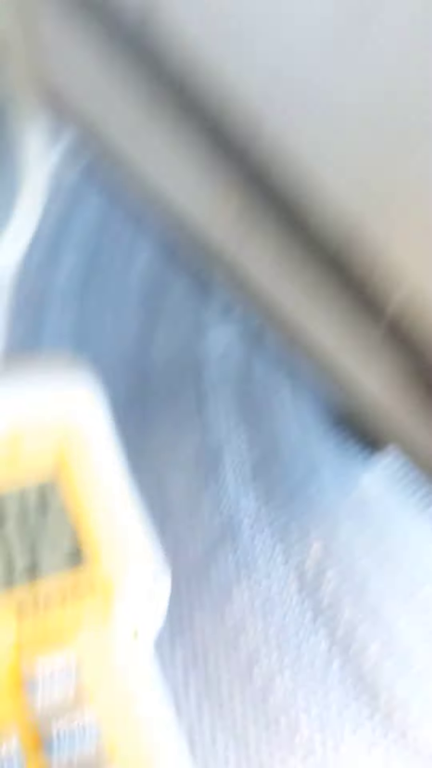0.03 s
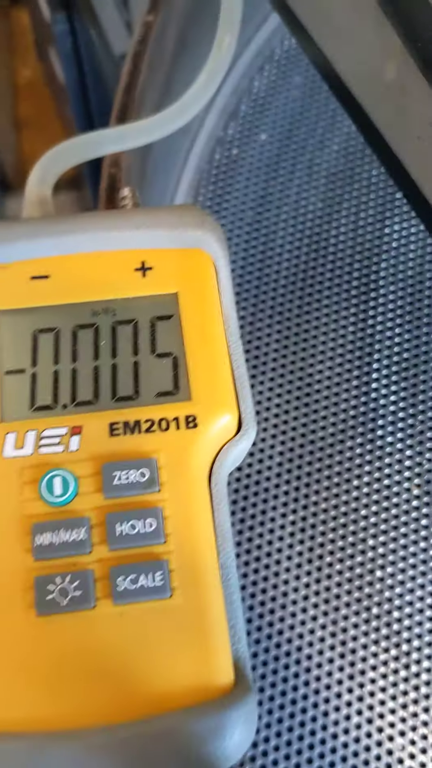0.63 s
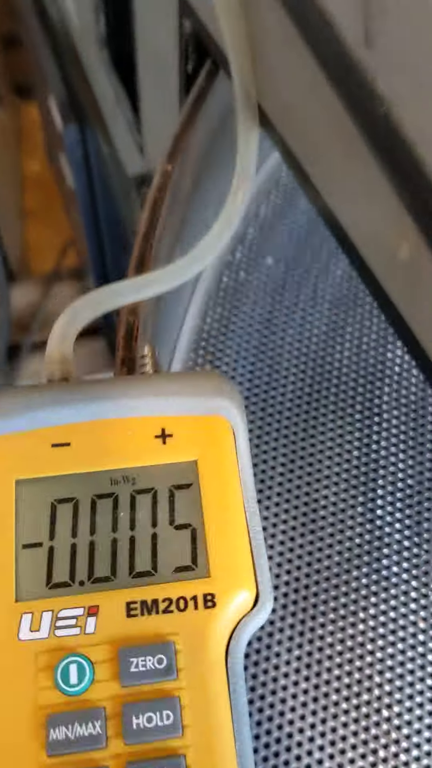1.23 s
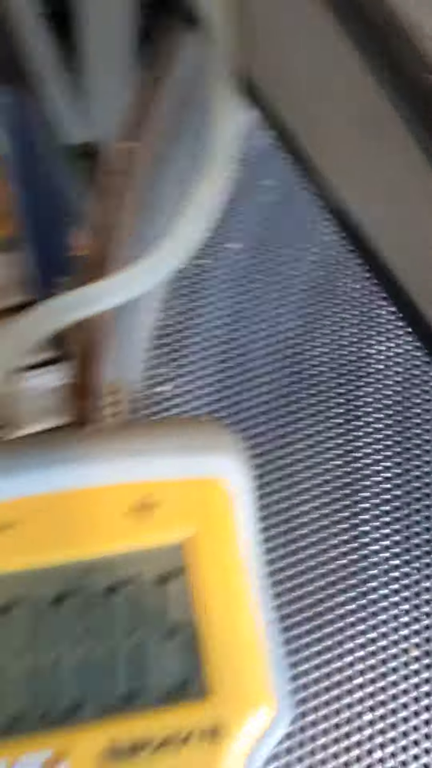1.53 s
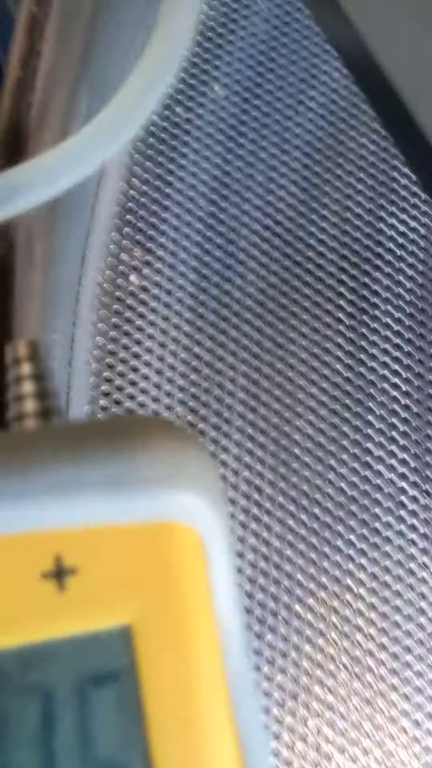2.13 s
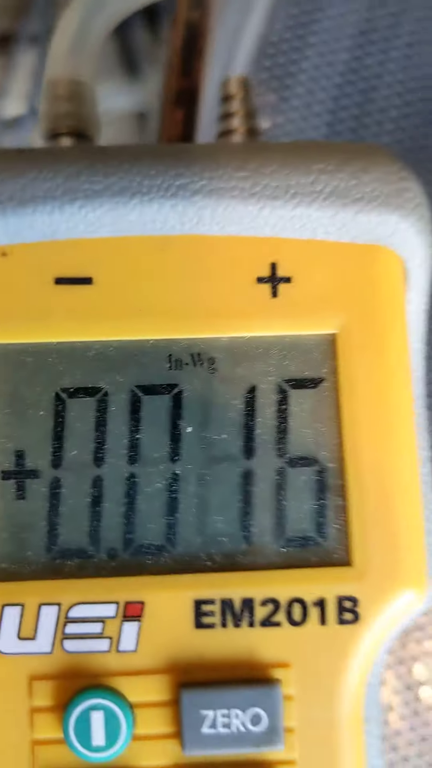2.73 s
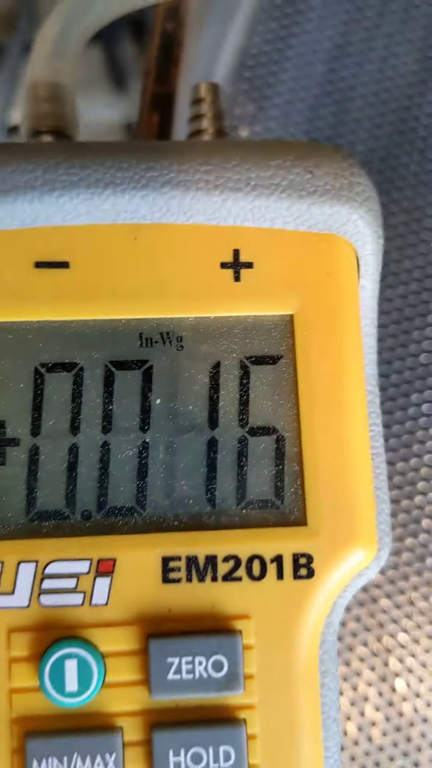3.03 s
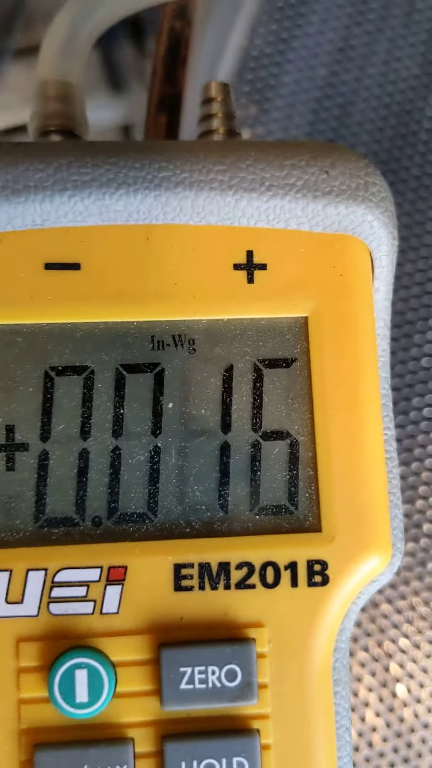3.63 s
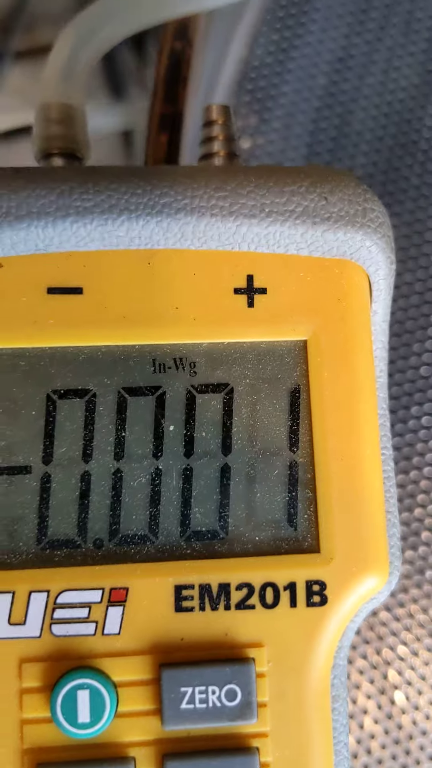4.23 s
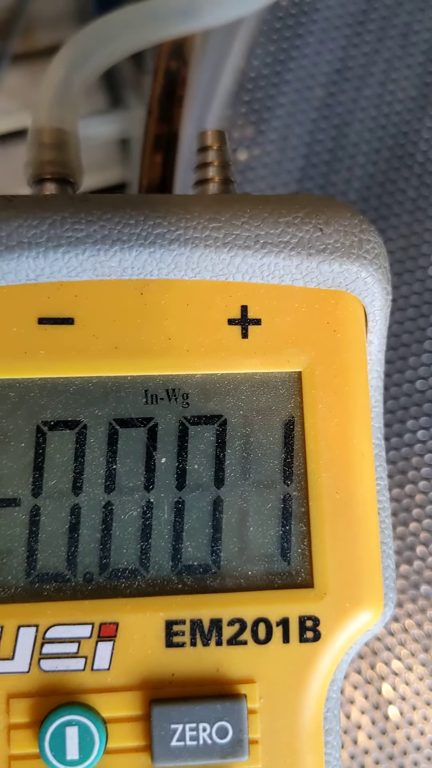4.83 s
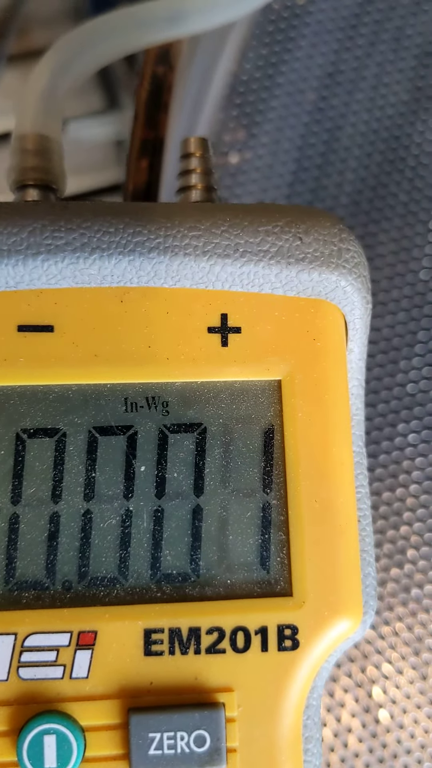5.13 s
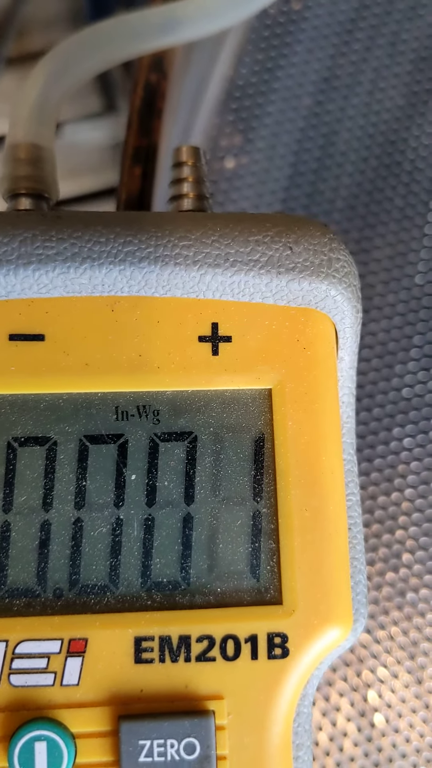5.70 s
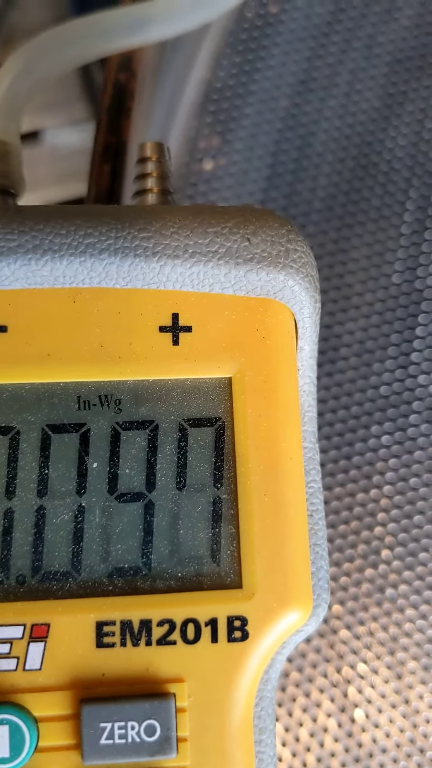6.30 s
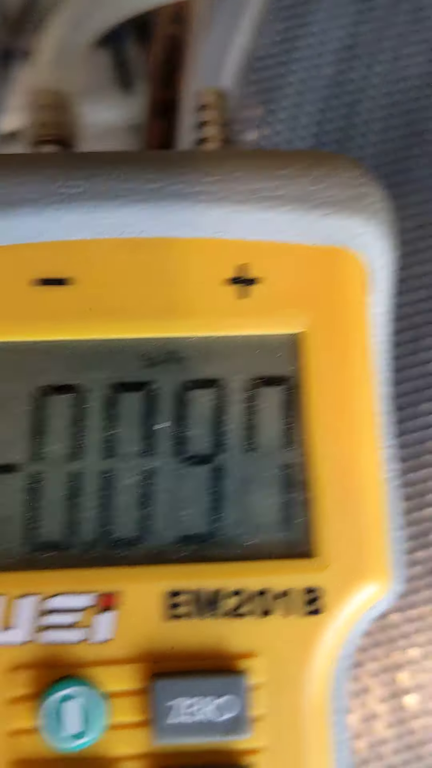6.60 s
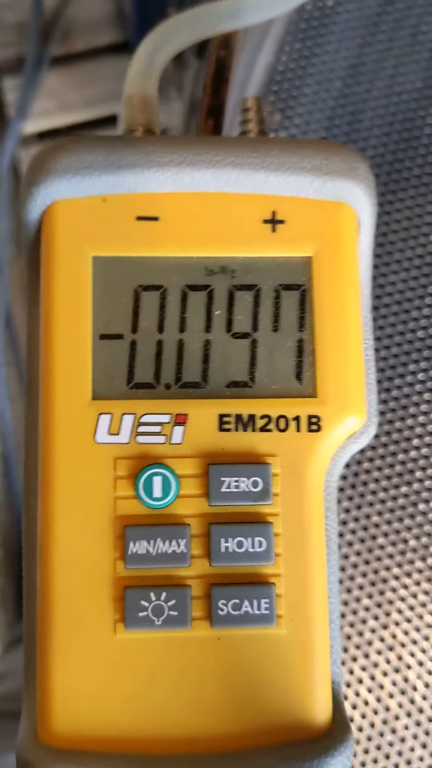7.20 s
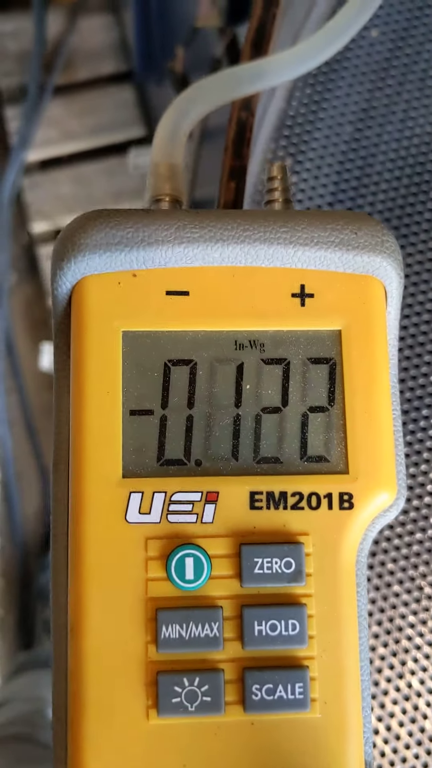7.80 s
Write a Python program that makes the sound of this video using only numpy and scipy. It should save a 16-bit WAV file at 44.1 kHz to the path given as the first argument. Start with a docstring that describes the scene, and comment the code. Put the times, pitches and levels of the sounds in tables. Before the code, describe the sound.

Close beside a running roasting machine indoors, a motor and fan hum steadily over a low rumble of air in the ducts. Air hisses softly through a perforated steel tray while sheet metal rattles and ticks faintly. A brief dry tap touches the right microphone at the start, a hand rustles softly, and near the end a plastic meter clicks once.

```python
"""Indoors, close beside a running coffee roaster, on a hand-held stereo recorder.
The motor and fan hum over a rumble of air in the ducts. Air hisses through a perforated steel tray,
slots and panels sing up now and then, and the sheet metal rattles and ticks faintly.
The balance shifts as the microphones move over the machine. Nearest of all is the hand: it touches
the recorder once, rustles softly, and near the end a plastic meter held in it clicks."""
import sys
import numpy as np
from scipy import signal
from scipy.fft import rfft, irfft
from scipy.io import wavfile
from scipy.ndimage import uniform_filter1d, minimum_filter1d

SR = 44100
rng = np.random.default_rng(int(sys.argv[2]) if len(sys.argv) > 2 else 0)


def log_audio(samples):
    """Write samples as a 16-bit WAV file to the path given in sys.argv[1]."""
    # one column per channel
    frames = np.atleast_2d(samples).T
    # limit to full scale, then quantise
    limited = np.clip(frames, -1, 1)
    pcm = np.round(limited * 32767).astype(np.int16)
    wavfile.write(sys.argv[1], SR, pcm)


N = 350595
T, HZ = np.arange(N) / SR, np.fft.rfftfreq(N, 1 / SR)

# How open the fan outlet lies to the moving microphones. Each row: time in seconds, exposure in dB.
OUTLET_EXPOSURE = [(0, -3.5), (1.25, -4), (1.65, -1), (2.1, 1.5), (2.7, -0.5), (4.6, 1), (6.2, 0), (6.8, 1),
                   (7.95, -0.5)]
# How alike the air sounds at the two microphones. Each row: frequency in Hz, correlation from -1 to 1.
MIC_LIKENESS = [(30, .98), (60, 0.94), (200, 0.99), (280, 1), (340, 0.92), (400, 0.84), (460, 0.77),
                (560, 0.59), (720, 0.26), (900, 0.057), (1250, -0.23), (1900, -0.048), (2600, -0.0014),
                (15000, -0.042)]

# Colours of the noises. Each row: frequency in Hz, relative level in dB.
RUMBLE_COLOUR = [(15, -40), (32, -28), (42, -16.5), (55, -5.5), (100, -5), (135, 0), (200, 0), (300, -2.5),
                 (345, -6), (400, -10.5), (600, -14), (900, -20.5), (1400, -32), (2500, -64)]  # air in the ducts
RUSH_COLOUR = [(400, -14), (900, 4.5), (1400, 1.5), (1900, -1), (2450, -2.5), (3000, -7), (4000, -17),
               (7000, -21.5), (15800, -36)]  # soft rush from the machine
HISS_COLOUR = [(1500, -25), (2800, 1.5), (4000, 1.5), (5000, -1), (6200, -1.1), (6900, -0.5), (7500, -5),
               (9300, -6.5), (10500, -15.5), (15800, -14)]  # air through the tray
SIZZLE_COLOUR = [(3000, -30), (6500, -5), (9000, -2.5), (10300, -2), (12500, -2.5), (15800, -10.5)]  # thin top of the hiss
RATTLE_COLOUR = [(1200, -30), (2500, 3), (5000, 4.5), (7000, -7), (9000, -7), (15000, -20)]  # loose contacts
PING_COLOUR = [(1200, -22), (2200, 0), (5000, -1), (7000, -3), (9000, -11), (15000, -20)]  # ticking sheet metal
RUSTLE_COLOUR = [(700, -20), (1300, 0), (2200, 1), (3200, -7), (8000, -26), (15000, -26)]  # the hand

# Resonances of the ducts and housing. Each row: centre in Hz, width in Hz, boost in dB.
DUCT_RESONANCES = [(45, 4, 6), (271, 18, 10), (288, 17, 11), (455, 24, 8)]
# The hiss as the microphones pass over the tray. Each row: time in seconds, level in dB.
HISS_PASS = [(0, -44), (.75, -45), (1.35, -42), (1.65, -49), (2.9, -41), (4, -44), (5, -43), (6.55, -44.5),
             (7, -42.5), (7.95, -43.5)]
# Gusts through the tray that lift the sizzle. Each row: centre and length in seconds, rise in dB.
TRAY_GUSTS = [(1.18, .6, 5), (2.8, 1.3, 1), (6.85, .65, 6)]
# Singing slots and panels. Each row: start and end in seconds, pitch and width in Hz, level in dB.
SINGING_SLOTS = [(.55, .9, 545, 12, -35), (1.85, 2.17, 542, 10, -30.5), (5.5, 5.8, 450, 16, -31),
                 (2.2, 2.62, 2530, 80, -46), (3.55, 3.95, 2520, 90, -47), (6.12, 6.42, 2520, 80, -47.5),
                 (2.2, 6.8, 6750, 500, -56), (5.9, 8.1, 9100, 1400, -55.5), (-.2, 6.6, 11830, 160, -66)]
# Swells of fine rattle in the machine. Each row: centre and length in seconds, level in dB.
RATTLE_SWELLS = [(1.29, .04, -46), (2.39, .06, -45), (2.96, .05, -47), (3.15, .08, -43), (3.72, .07, -47),
                 (4.71, .08, -43), (4.97, .05, -47), (5.15, .07, -42.5), (5.58, .06, -43.5),
                 (6.0, .07, -45), (7.82, .07, -44)]
# The clear ticks of the sheet metal. Each row: start in seconds, peak in dB before colouring.
METAL_PINGS = [(.1312, -34), (1.4945, -21), (1.898, -24), (2.065, -19), (3.1402, -23), (5.4585, -24),
               (5.558, -24), (5.9902, -29)]

# Shifts of the hand's grip. Each row: centre and length in seconds, level in dB.
GRIP_SHIFTS = [(.92, 0.24, -38.5), (1.25, .25, -42), (2.42, .14, -43.5), (4.74, .12, -43)]
# One touch by the right microphone: start in seconds, peak on the right in dB, left over right in dB.
MIC_TOUCH = (.2188, -5, -26)
# Slips of the meter's case, heard as one click.
# Each row: start in seconds, peak in dB before panning, left over right in dB.
CASE_SLIPS = [(7.0732, -9, 1), (7.075, -13, -5), (7.0774, -9.5, 2), (7.0798, -12, 1), (7.0815, -8.5, 5),
              (7.0875, -18, 0)]
# Ringing modes. Each row: frequency in Hz, relative level in dB, seconds to fall by 60 dB.
TOUCH_MODES = [(2260, -4, 0.0029), (10700, 2, 0.00096)]  # the touched recorder
CASE_MODES = [(1860, 2, 0.012), (1950, -7, .02), (2420, 2.5, 0.014), (2750, -7, 0.0039), (3170, 1, 0.0043),
              (4200, -8, 0.009), (6600, -6, 0.006), (7500, -2.5, 0.0063), (8500, -7, .005)]  # the meter's plastic case

# Weak steady tones of the drive and panels. Each row: frequency in Hz, rms level in dB.
PANEL_TONES = [(259.05, -33), (330.17, -35), (349.12, -43), (522, -46), (539.5, -42), (569.35, -46)]
# The microphones cross the whine's standing wave. Each row: centre and length in seconds, rise in dB.
WHINE_CROSSINGS = [(1.7, 0.21, 3.5), (6.76, 0.24, 6.5)]
# Tones of the fan. Each row: multiple of the shaft speed, base level in dB, left over right in dB,
# lead of the left microphone in radians, share of the outlet's exposure from 0 to 1.
FAN_ORDERS = [(2, -31, -2, 0, 0.3), (3, -34.5, -1, 0.25, 0.2), (4, -37, -2, 0, 0.1),
              (5, -29.5, 0, -0.2, 0.4), (6, -29, -4, -0.8, 0), (8, -14.5, 1.5, 0.12, 0.07),
              (16, -26.5, -2, 0.49, 1), (28, -49, 16.5, 1.5, 1), (32, -58, 9, -3, 0.4),
              (38, -69, -9, -3, .3), (40, -49, 8, 4, .3)]


def amp(db):
    """Decibels to gain."""
    return 10 ** (np.asarray(db) / 20)


def unit(x):
    """Scales to rms 1."""
    return x / np.sqrt(np.mean(x ** 2) + 1e-20)


def across(points):
    """Reads a table over log frequency."""
    hz, value = np.transpose(points)
    return np.interp(np.log(HZ + 1), np.log(hz + 1), value)


def along(points):
    """Reads a table over time."""
    return np.interp(T, *np.transpose(points))


def sides(pan_db):
    """Gains at the two microphones, the left louder by pan_db."""
    return amp(np.array([[pan_db], [-pan_db]]) / 2)


def bell(centre, length):
    """A smooth rise and fall around a time."""
    return np.exp(-(2 * (T - centre) / length) ** 2)


def swells(rows):
    """Smooth rises in dB, one for each row."""
    return sum(db * bell(centre, length) for centre, length, db in rows)


def wander(rate):
    """A random drift of rms 1, up to about this many changes a second."""
    return unit(irfft(rfft(rng.standard_normal(N)) * np.exp(-(HZ / rate) ** 2) * (HZ > 0), N))


def noise(shape_db):
    """Coloured noise at the two microphones: alike in the bass, diffuse in the treble."""
    left, other = rfft(rng.standard_normal((2, N)))
    likeness = np.clip(across(MIC_LIKENESS), -1, 1)
    right = likeness * left + np.sqrt(1 - likeness ** 2) * other
    return unit(irfft(np.array([left, right]) * amp(shape_db), N))


def add(mix, start, sound):
    """Adds a stereo sound at a time in seconds."""
    part = mix[:, round(start * SR):][:, :sound.shape[1]]
    part += sound[:, :part.shape[1]]


def duct_rumble(level_db=-14.0, shadow_share=0.58, shadow_hz=370):
    """Turbulence rings the ducts; its upper part passes in and out of shadow as the microphones move."""
    resonance_db = sum(db * np.exp(-2 * ((HZ - hz) / width) ** 2) for hz, width, db in DUCT_RESONANCES)
    air = noise(across(RUMBLE_COLOUR) + resonance_db)
    upper = irfft(rfft(air) * (1 + np.tanh((HZ - shadow_hz) / 40)) / 2, N)
    upper_gain = amp(shadow_share * along(OUTLET_EXPOSURE))
    return amp(level_db) * (air + upper * (upper_gain - 1))


def eddies(air, depth_db, rate):
    """Uneven flow: overlapping bands swell and fade each on their own."""
    spectrum, centres_hz = rfft(air), np.geomspace(900, 15000, 9)
    bands = (irfft(spectrum * np.interp(HZ, centres_hz, pick), N) for pick in np.eye(len(centres_hz)))
    return unit(sum(band * amp(depth_db * wander(rate)) for band in bands))


def panel_echoes(direct, strength=0.074, drift_s=.00004, count=8):
    """Nearby steel panels return short echoes, which comb the sound and shift as the hand drifts."""
    out = direct.copy()
    for mic, sound in zip(out, direct):
        drift = drift_s * wander(1)
        for delay_s, slope in rng.uniform([.001, -1], [.012, 1], (count, 2)):
            echo = np.interp(T - slope * drift, T, sound)
            mic += strength * np.roll(echo, round(delay_s * SR))
    return out


def tray_air(rush_db=-35.0, rush_share=0.31, sizzle_db=-51.5, eddy_db=0.57, flicker_db=0.95):
    """Air rushes from the fan outlet and hisses through the tray's small holes; gusts add sizzle."""
    rush_gain = amp(rush_db + rush_share * along(OUTLET_EXPOSURE)) * sides(0.95)
    rush = rush_gain * eddies(noise(across(RUSH_COLOUR)), eddy_db, rate=25)
    hiss = amp(along(HISS_PASS)) * sides(1.0) * eddies(noise(across(HISS_COLOUR)), eddy_db, rate=10)
    sizzle = amp(sizzle_db + swells(TRAY_GUSTS) + eddy_db * wander(12)) * noise(across(SIZZLE_COLOUR))
    return panel_echoes(rush + hiss + sizzle) * amp(flicker_db * wander(34))


def singing_slots(waver_db=3.5):
    """The air stream excites narrow resonances of slots and panels, which come and go."""
    out = np.zeros((2, N))
    for start, end, hz, width, db in SINGING_SLOTS:
        fade_s = .15 * (end - start) + .07
        gate = np.clip(np.minimum(T - start, end - T) / fade_s, 0, 1)
        resonance_db = -20 * np.log10(1 + (2 * (HZ - hz) / width) ** 2)
        out += amp(db + waver_db * wander(5.4)) * gate * noise(resonance_db)
    return out


def loose_rattle(per_s=900, spread_db=9.0, steady_db=-52.0):
    """Tiny loose contacts tick all the time and now and then swell together."""
    contacts = rng.random((2, N)) < per_s / SR
    force = amp(spread_db * np.minimum(rng.exponential(1, (2, N)), 4))
    t = T[:SR // 50]
    scatter = rng.standard_normal((2, len(t))) * np.exp(-t / 0.0052)
    grains = signal.fftconvolve(contacts * force, scatter, axes=1)[:, :N]
    level = amp(steady_db) + sum(amp(db) * bell(centre, length) for centre, length, db in RATTLE_SWELLS)
    return level * unit(irfft(rfft(grains) * amp(across(RATTLE_COLOUR)), N))


def metal_pings(t60=0.025, faint_per_s=9, faint_db=-30.5):
    """Short bright ticks in the sheet metal: a few clear ones among many faint."""
    t, out = T[:SR // 20], np.zeros((2, N))
    chances = rng.random((200, 2))[:round(faint_per_s * T[-1])]
    faint = [(when * T[-1], faint_db + 4 * size) for when, size in chances]
    for start, db in METAL_PINGS + faint:
        burst = rng.standard_normal((2, len(t))) * amp(-60 * t / t60)
        add(out, start, amp(db) * burst / abs(burst).max())
    return 2 * irfft(rfft(out) * amp(across(PING_COLOUR)), N)


def hand_rustle(uneven_db=2.5):
    """The hand shifts its grip with a soft brushing sound, close to the microphones."""
    level = sum(amp(db) * bell(centre, length) for centre, length, db in GRIP_SHIFTS)
    return level * amp(uneven_db * wander(30)) * noise(across(RUSTLE_COLOUR))


def mic_touch(attack_s=0.00028):
    """A dry touch right beside the port of the right microphone rings for an instant."""
    start, db, left_db = MIC_TOUCH
    t, out = T[:SR // 50], np.zeros((2, N))
    ring = sum(amp(mode_db - 60 * t / t60) * np.sin(2 * np.pi * hz * t)
               for hz, mode_db, t60 in TOUCH_MODES)
    ring *= 1 - np.exp(-t / attack_s)
    add(out, start, amp([[db + left_db], [db]]) * ring / abs(ring).max())
    return out


def meter_click(crack_gain=0.47, top_hz=8800, room_db=-12.0, room_t60=0.19):
    """The plastic case slips in quick steps, each a dry crack and a short ring; the room answers."""
    t, direct = T[:SR // 10], np.zeros((2, N))
    crack_band = signal.butter(2, [1300, 8000], "band", fs=SR, output="sos")
    lowpass = signal.butter(6, top_hz, fs=SR, output="sos")
    for start, db, pan_db in CASE_SLIPS:
        ring = sum(amp(mode_db - 60 * t / t60) * np.sin(2 * np.pi * (hz * t + rng.random((2, 1))))
                   for hz, mode_db, t60 in CASE_MODES)
        crack = signal.sosfilt(crack_band, rng.standard_normal((2, len(t))) * np.exp(-t / 0.0017))
        slip = signal.sosfilt(lowpass, ring + crack_gain * crack)
        add(direct, start, amp(db) * sides(pan_db) * slip / abs(slip).max())
    t = T[:SR // 2]
    tail = rng.standard_normal((2, len(t))) * amp(-60 * t / room_t60) * (t > .004)
    room = signal.fftconvolve(direct, tail / np.linalg.norm(tail[0]), axes=1)[:, :N]
    return direct + amp(room_db) * room


def motor_and_fan(shaft_hz=29.794, mains_hz=59.995, sway_turns=0.0007, flutter_db=0.9,
                  whine_db=-38.5, whine_lead_rad=0.63, hum_db=-21.0, hum_waver_db=1.5):
    """Tones at multiples of the shaft speed, the eighth strongest as the blades pass, and mains hum."""
    turns = shaft_hz * T + sway_turns * wander(1.4)
    exposure_db, out = along(OUTLET_EXPOSURE), np.zeros((2, N))
    for order, db, pan_db, lead, share in FAN_ORDERS:
        phase = 2 * np.pi * (order * turns + rng.random()) + np.array([[lead], [-lead]]) / 2
        out += amp(db + share * exposure_db + flutter_db * wander(2.9)) * sides(pan_db) * np.sin(phase)
    # The whine lies at three times the blade rate.
    whine = np.sin(2 * np.pi * (24 * turns + rng.random()) + np.array([[whine_lead_rad], [0]]))
    out += amp(whine_db + exposure_db + swells(WHINE_CROSSINGS)) * sides(1.5) * whine
    # The magnetic hum, at twice the mains, beats slowly with the fourth order.
    hum = np.sin(2 * np.pi * (2 * mains_hz * T + rng.random()))
    out += amp(hum_db + hum_waver_db * wander(1.3)) * sides(-1.4) * hum
    for hz, db in PANEL_TONES:
        level = amp(db + 0.5 * wander(5.3))
        out += level * np.sin(2 * np.pi * (hz * T + rng.random()) + .5 * wander(1.4))
    return np.sqrt(2) * out  # from rms to the sines' peaks


def scene():
    """The roaster close by, and the small sounds of the hand right at the microphones."""
    roaster = motor_and_fan() + duct_rumble() + tray_air() + singing_slots()
    sheet_metal = loose_rattle() + metal_pings()
    handling = hand_rustle() + meter_click() + mic_touch()
    return roaster + sheet_metal + handling


def record(dry):
    """The recorder's smooth limiter holds the crests under full scale; the top treble is cut off."""
    gain = np.minimum(1, .95 / (abs(dry).max(0) + 1e-9))
    gain = uniform_filter1d(minimum_filter1d(gain, size=601), size=601)
    lowpass = signal.firwin(511, cutoff=15850, window=("kaiser", 9), fs=SR)
    return signal.oaconvolve(dry * gain, lowpass[None], "same")


dry = scene()
out = record(dry)
log_audio(out)
```